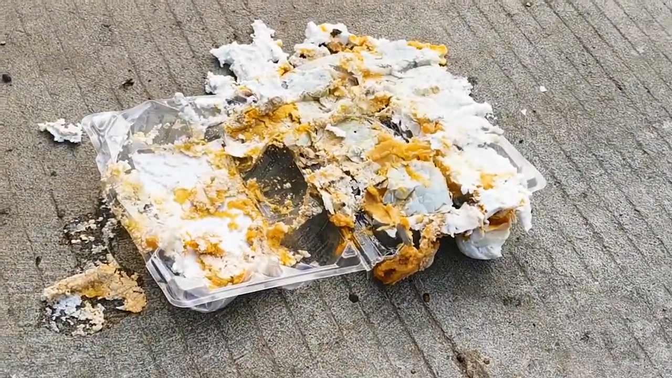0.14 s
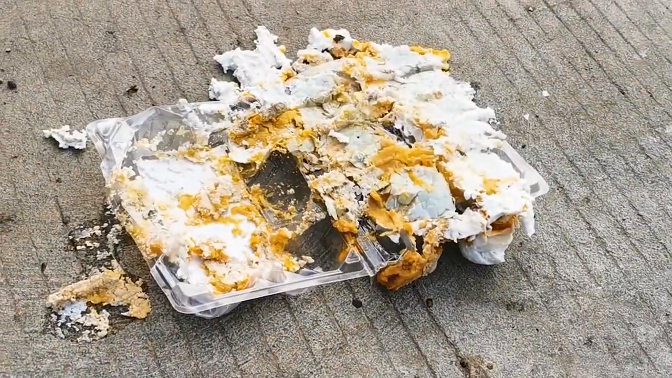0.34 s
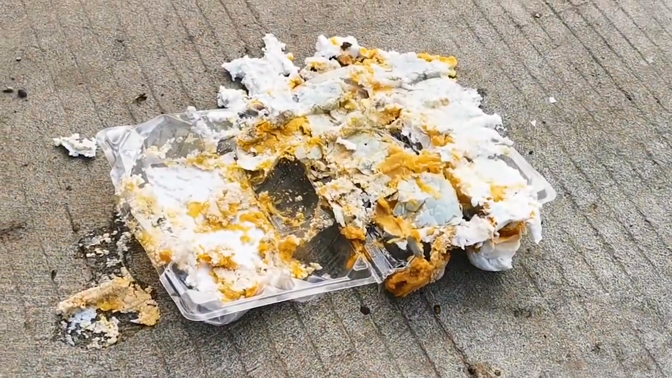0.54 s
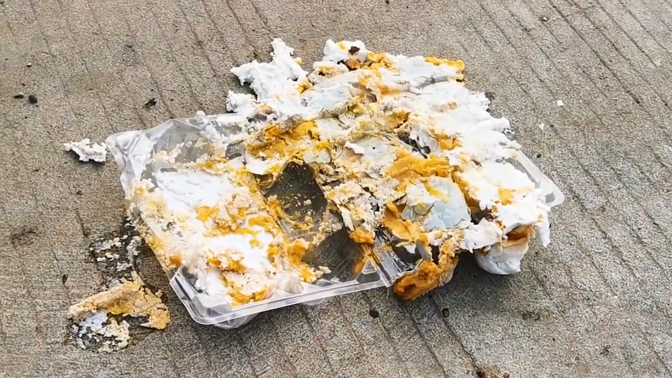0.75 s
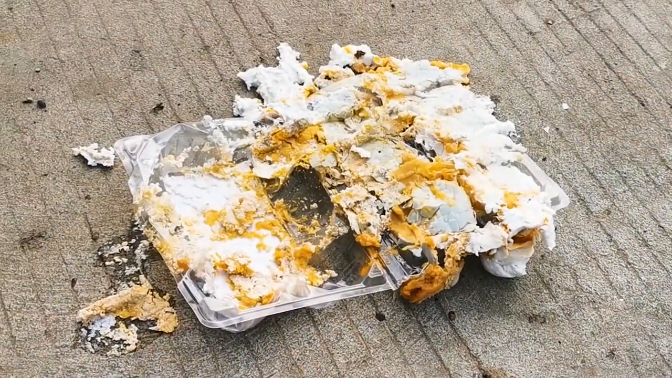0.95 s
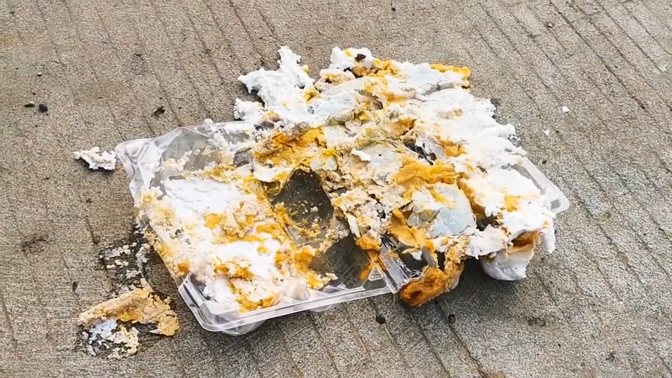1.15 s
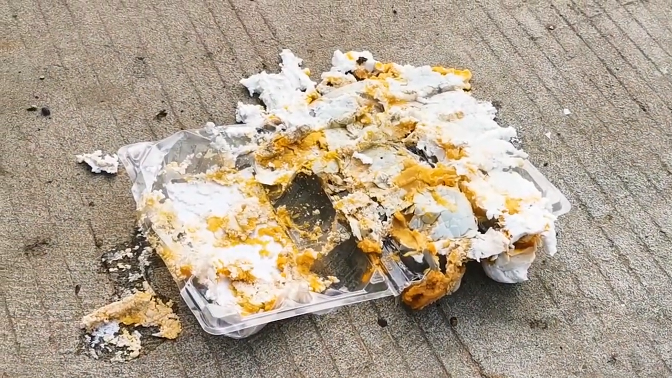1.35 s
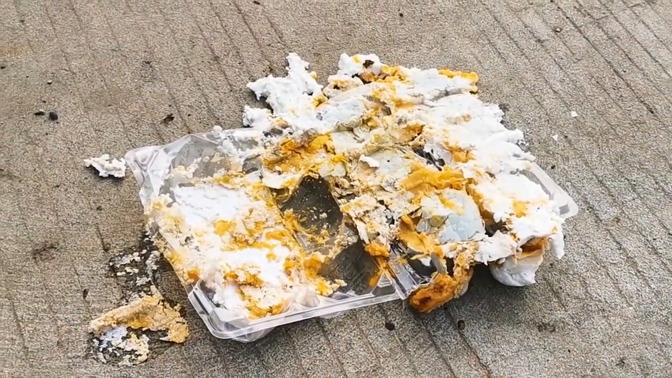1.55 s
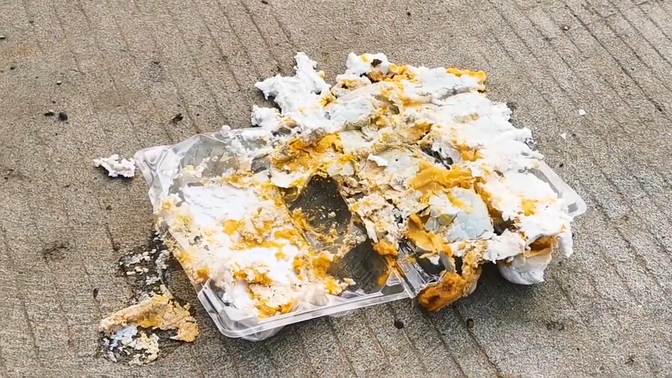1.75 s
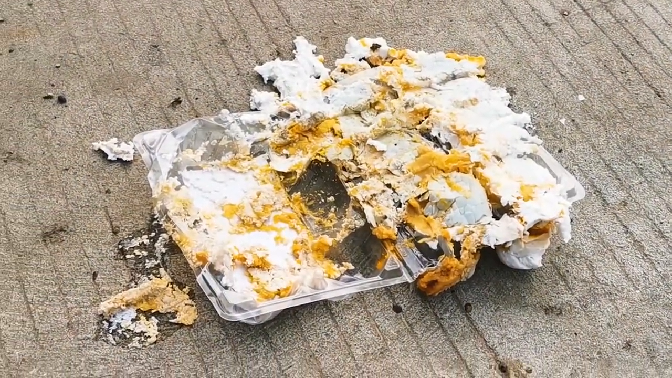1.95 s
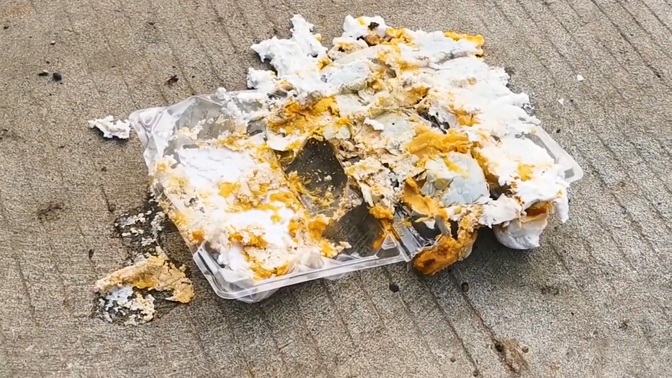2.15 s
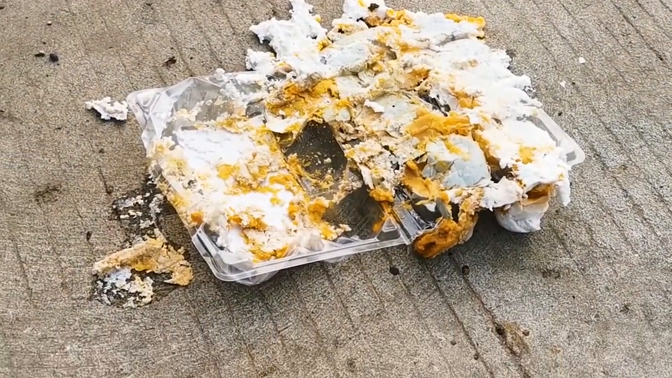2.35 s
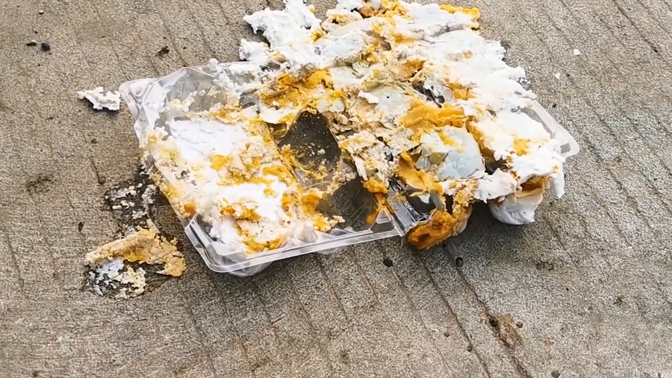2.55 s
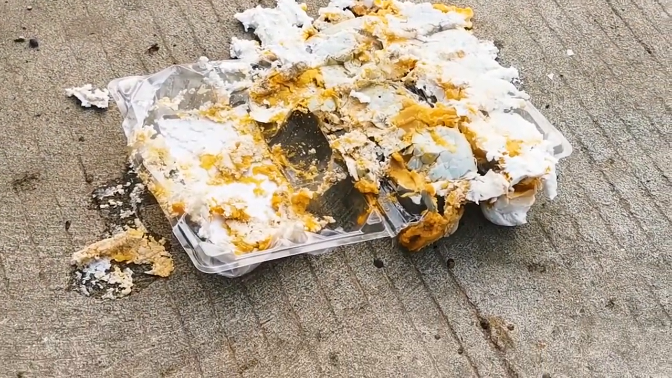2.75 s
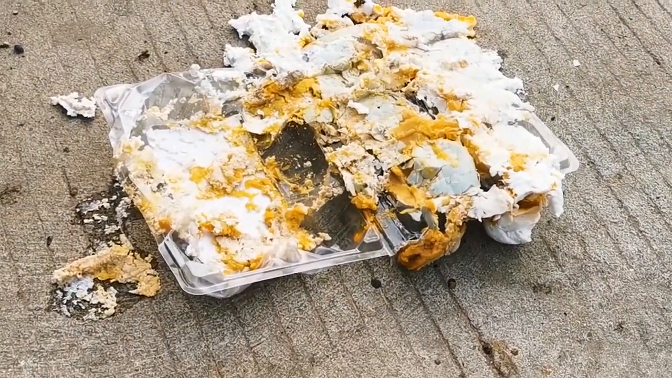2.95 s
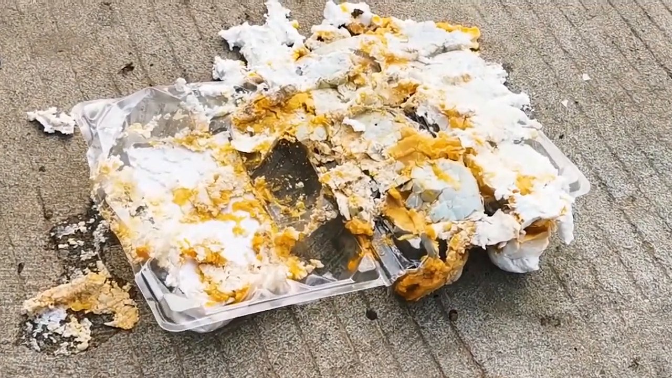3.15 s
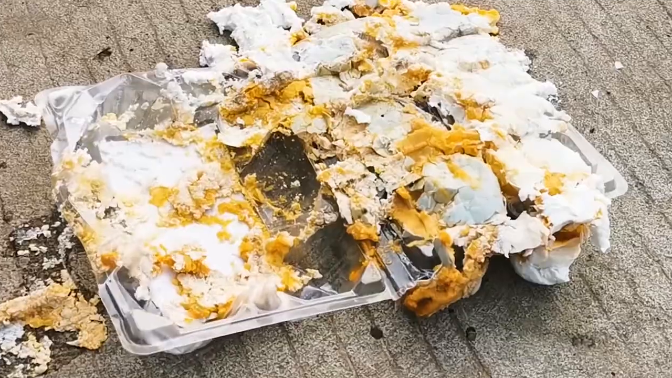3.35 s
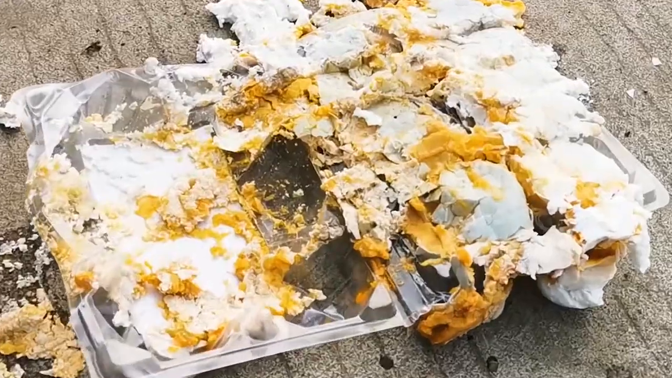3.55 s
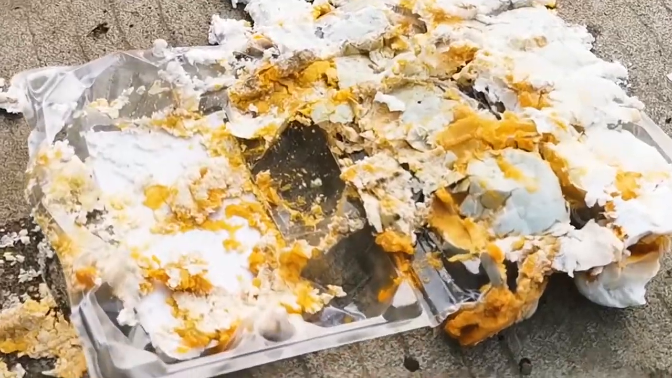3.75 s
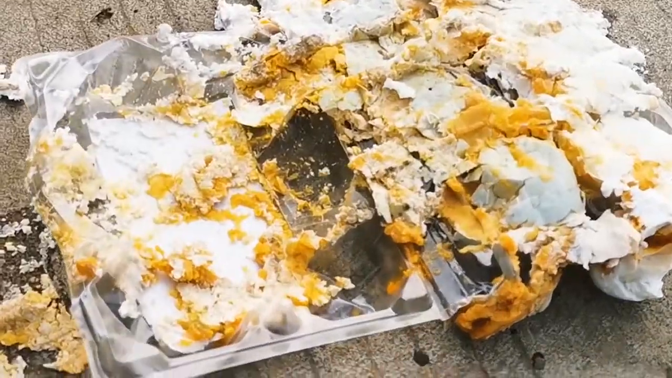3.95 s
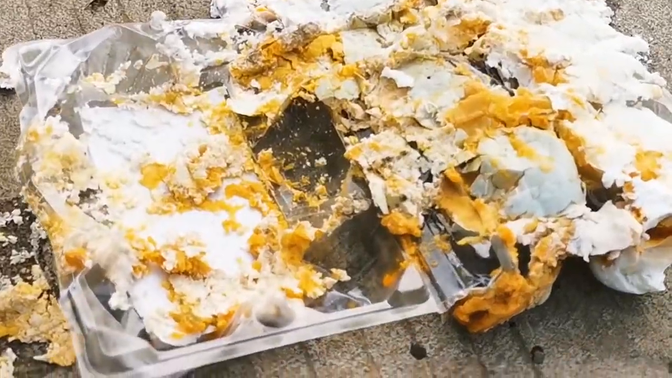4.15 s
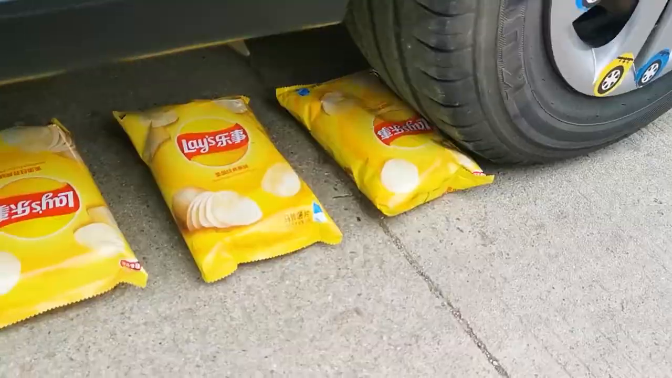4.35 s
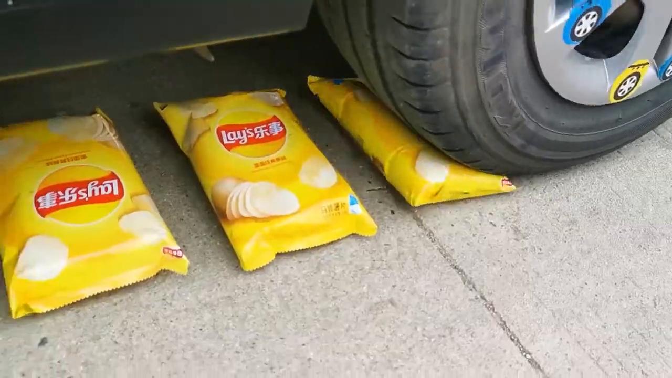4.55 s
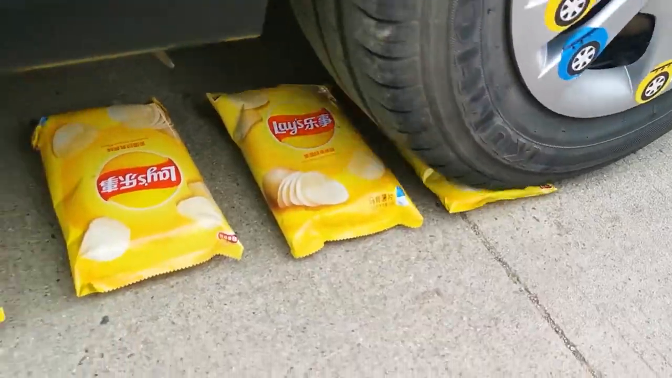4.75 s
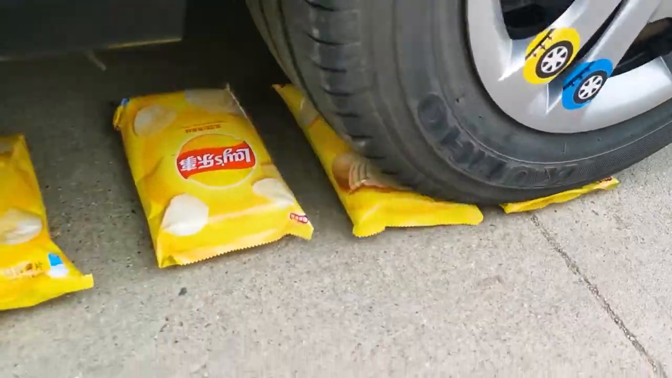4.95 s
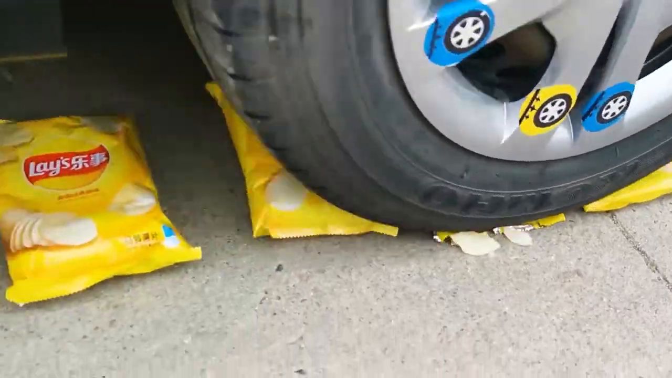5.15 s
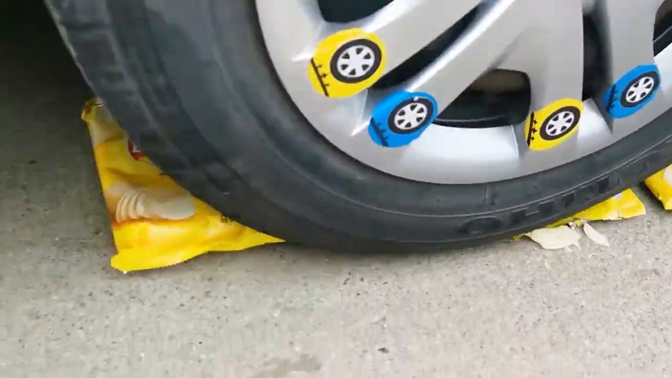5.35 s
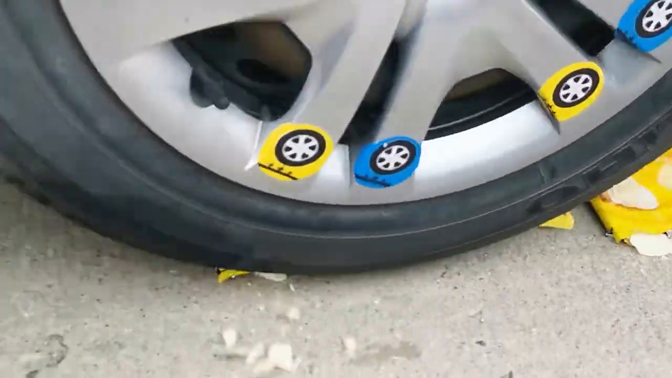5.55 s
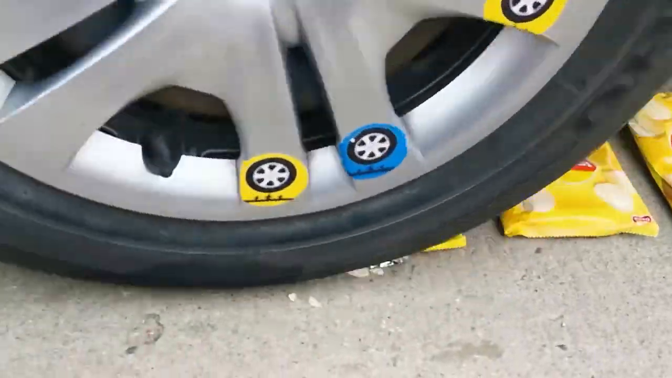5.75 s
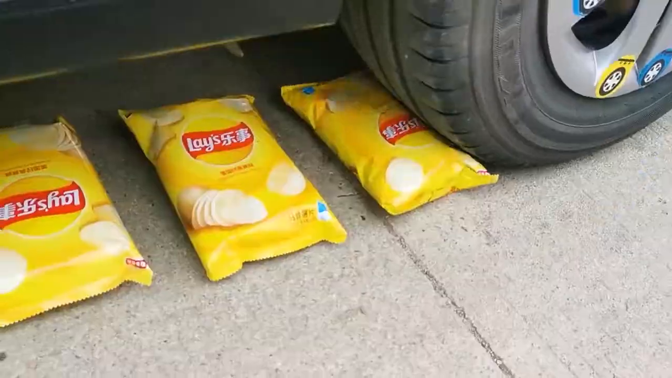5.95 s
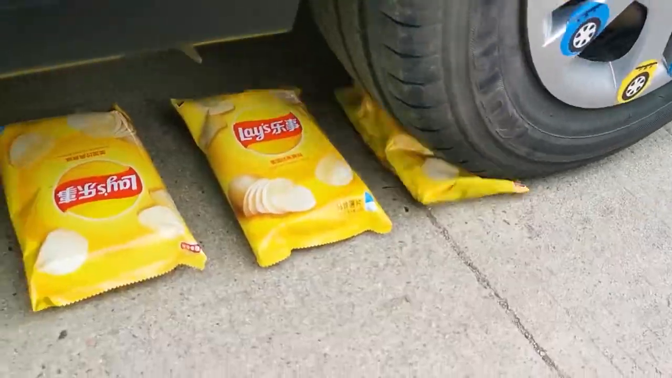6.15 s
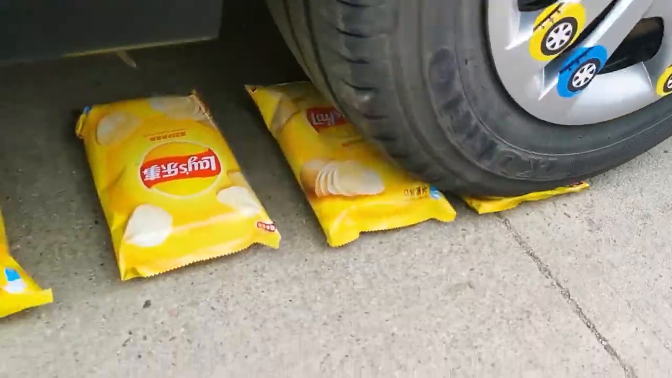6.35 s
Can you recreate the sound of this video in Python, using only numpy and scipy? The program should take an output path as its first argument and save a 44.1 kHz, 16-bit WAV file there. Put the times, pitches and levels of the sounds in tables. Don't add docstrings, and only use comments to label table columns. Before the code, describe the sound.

An engine idles over a concrete yard with tray knocks and gritty scuffs, then a creeping tyre crunches chip bags that burst with loud pops.

```python
import sys
import numpy as np
from scipy import signal
from scipy.fft import rfft, irfft
from scipy.io import wavfile
from scipy.ndimage import uniform_filter1d, map_coordinates

SR = 44100
rng = np.random.default_rng(int(sys.argv[2]) if len(sys.argv) > 2 else 0)


def output_pcm(signal):
    pcm = np.clip(np.atleast_2d(signal).T, -1, 1) * 32767
    wavfile.write(sys.argv[1], SR, np.round(pcm).astype(np.int16))


def convert_level_to_amplitude(level_db):
    exponent = np.asarray(level_db, float) / 20
    return 10 ** exponent


N = 281799
CLOCK = np.arange(N) / SR
LEFT_RIGHT = np.array([[1], [-1]])
CUT_S, BACK_S, CREEP_S = 4.232, 4.3205, 1.6
CREEP_SIZE = round(CREEP_S * SR)
CREEP = slice(round(BACK_S * SR), round(BACK_S * SR) + CREEP_SIZE)


def in_time(rows):
    s, *columns = np.transpose(rows)
    return [np.interp(CLOCK, s, column) for column in columns]


def at_hz(points, hz):
    table_hz, values = np.transpose(points)
    return np.interp(np.log(hz), np.log(table_hz), values)


def rms_one(x):
    return x / np.sqrt(np.mean(x ** 2) + 1e-20)


def drift(rate_hz, size):
    step = 16
    r = np.exp(-2 * np.pi * rate_hz * step / SR)
    white = rng.standard_normal(size // step + 3002)
    slow = signal.lfilter([1], [1, -2 * r, r * r], white)[3000:]
    return np.interp(np.arange(size) / step, np.arange(len(slow)), rms_one(slow))


def band(x, low_hz, high_hz):
    edges = [low_hz, min(high_hz, .45 * SR)]
    return signal.sosfilt(signal.butter(2, edges, "band", fs=SR, output="sos"), x)


def widen(mid, side, alike):
    alike = np.clip(alike, -1, 1)
    return np.sqrt(1 + alike) * mid + np.sqrt(1 - alike) * side * LEFT_RIGHT


def noise(size=N):
    return rng.standard_normal((2, 2, size))


EDGES = np.append(22 * 2 ** np.arange(0, 6, 1 / 3), 1408 * 2 ** np.arange(0, 3.7, 1 / 5))


def coloured(source, spectrum, likeness, patchy_db, rate_hz):
    out, size = 0, source.shape[-1]
    together = drift(rate_hz / 3, size)
    for k, (low, high) in enumerate(zip(EDGES, EDGES[1:])):
        hz = np.sqrt(low * high)
        if spectrum[0][0] < hz < spectrum[-1][0]:
            mid, side = band(source[k % len(source)], low, high)
            flicker_db = patchy_db * (together + drift(rate_hz, size))
            out = out + convert_level_to_amplitude(at_hz(spectrum, hz) + flicker_db) * widen(mid, side, at_hz(likeness, hz))
    return rms_one(out)


def ring(t, hz, t60):
    return np.sin(2 * np.pi * hz * t) * convert_level_to_amplitude(-60 * t / t60)


def add(out, s, sound):
    i = round(s * SR)
    out[..., i:i + sound.shape[-1]] += sound[..., :N - i]


def swell(t, s, hold_s, rise_db_per_s, fall_db_per_s):
    return -rise_db_per_s * np.maximum(s - t, 0) - fall_db_per_s * np.maximum(t - s - hold_s, 0)


# t/s, firing rate f/Hz, body drone level/dB re its mean, nearness level/dB
IDLE = [(0.0, 31.63, -4, -0.5), (0.56, 31.82, 4.5, 2.5), (0.7, 32.09, -8.5, 2), (1.1, 32.53, -8.5, 1.5),
        (1.43, 31.8, -9, -1), (1.8, 31.05, -3.5, 1), (1.95, 30.27, -10, -1), (2.34, 30.55, -8.5, 0),
        (2.6, 30.31, -3, 0.5), (3.1, 31.15, -2.5, 2), (3.75, 31.19, 4, 3.5), (4.22, 31.4, 3, 1.5)]
# multiple of the firing rate, level/dB, share of the drone swing,
# share of the nearness swing
SWAYING_ORDERS = [(1, -42.5, 0.05, 0.1), (6, -44.5, 0.38, 0.091), (15, -56, 1.29, 0.12), (9.5, -64, .2, 1.5),
                  (8.7, -68, .2, 1.5)]
# multiple of the firing rate, level/dB
FLICKERING_ORDERS = [(2, -56.5), (3, -74), (4, -65), (5, -57.5), (7, -64), (43, -60)]


def engine():
    hz, drone_db, near_db = in_time(IDLE)
    turn = 2 * np.pi * np.cumsum(hz) / SR
    out = np.zeros(N)
    for k, db, drone_share, near_share in SWAYING_ORDERS:
        level_db = db + drone_share * drone_db + near_share * near_db + 0.81 * drift(1.3, N)
        out += convert_level_to_amplitude(level_db) * np.sin(k * turn + k)
    for k, db in FLICKERING_ORDERS:
        out += convert_level_to_amplitude(db + 3.9 * drift(29.0, N)) * np.sin(k * turn + 3 * k)
    return out


# f/Hz, level/dB per Hz
YARD_LOW = [(18, -41), (30, 1), (53, -8.5), (108, -15), (139, -16), (187, -14), (252, -25), (483, -22.5),
            (630, -25.5), (924, -22), (1600, -36), (2080, -77), (3520, -120)]
# f/Hz, level/dB per Hz
YARD_HIGH = [(760, -36), (1300, -14), (1470, -12.5), (1860, 2), (2370, -0.5), (3450, -6), (3880, 6.5),
             (4440, -49), (5260, -8.5), (6150, -11), (8790, -15), (9460, -8), (11200, -18.5),
             (12300, -22.5), (16000, -39)]
# f/Hz, likeness
YARD_LIKENESS = [(60, .99), (300, .96), (700, .85), (1100, .55), (2200, .7), (5000, .45), (15000, .3)]
# f/Hz, width f/Hz, level/dB
WHIRRS = [(5150, 890, -65.5), (7990, 500, -69), (9300, 50, -87), (9300, 39, -83), (11100, 50, -76)]


def yard_air():
    near_db = in_time(IDLE)[2]
    out = convert_level_to_amplitude(-50 + near_db) * coloured(noise(), YARD_LOW, YARD_LIKENESS, 0.98, 50.0)
    rustle_db = -57 + 0.48 * near_db
    out += convert_level_to_amplitude(rustle_db) * coloured(noise(), YARD_HIGH, YARD_LIKENESS, 0.87, 45.0)
    mid, side = rng.standard_normal((2, N))
    for hz, width_hz, db in WHIRRS:
        out += convert_level_to_amplitude(db) * rms_one(band(mid + .5 * side * LEFT_RIGHT, hz - width_hz / 2, hz + width_hz / 2))
    return out


TRAY_HZ = [423, 520, 610, 800, 890, 1063, 1200, 1274, 1335, 1400, 1500, 1754, 1950, 2180, 2300, 2506, 3150,
           3700, 4400, 5150, 7800, 8200]
# t/s, peak level/dB, centre f/Hz, spread/octaves
KNOCKS = [(.326, -28, 1200, .3), (.327, -39, 1760, .05), (.343, -27, 1230, .3), (.356, -23.5, 1210, 0.14),
          (.36, -47, 423, .08), (.368, -26, 1400, 0.18), (.368, -38, 1760, .05), (.385, -30, 1200, .1),
          (.556, -42, 900, 0.14), (0.76, -39.5, 900, .2), (.608, -33.5, 1400, 0.09), (.625, -43, 890, .1),
          (.708, -32, 1000, .19), (.708, -48, 2180, .08), (.738, -34.5, 1760, 0.19),
          (.739, -40.5, 2180, 0.13), (.74, -37, 1000, .25), (.745, -42, 520, .1), (.752, -32, 1063, .24),
          (.805, -25.5, 1400, 0.045), (.827, -38.5, 890, .12), (.929, -45, 885, .09), (1.6, -53, 800, .08),
          (2.455, -48.5, 3150, .1), (3.461, -30, 2230, .3), (3.461, -41.5, 5150, .17),
          (3.497, -38, 900, .3), (3.506, -33.5, 2180, 0.61), (3.51, -41.5, 3150, .05),
          (3.513, -47, 5150, .15), (4.6, -39, 500, .2), (3.557, -37, 610, 0.11), (3.648, -44.5, 620, 0.12),
          (3.650, -28.5, 2158, 0.43), (3.651, -30, 8000, .1), (3.759, -41.5, 2100, .25),
          (3.762, -43, 800, 0.052), (3.782, -42.5, 2030, 0.22)]
# t/s, peak level/dB, f/Hz, ring t60/s
THUDS = [
    (0.369, -61, 180, 0.15),
    (0.749, -34, 134.6, 0.12),
    (2.462, -33.5, 128, 0.15),
]


def tray():
    out, t, modes = np.zeros(N), np.arange(SR // 3) / SR, np.array(TRAY_HZ)[:, None]
    rub_s, lean_db = 0.014, 5
    rub_size = SR // 20
    for s, db, hz, spread in KNOCKS:
        luck = rng.standard_normal((len(modes), 1))
        t60 = 0.044 + 0.17 * spread
        near = np.exp(-(np.log2(modes / hz) / spread) ** 2) + 0.011
        strength = near * convert_level_to_amplitude(1.5 * luck) * np.sign(luck)
        body = np.sum(strength * ring(t, modes, t60), axis=0)
        body *= 1 - np.exp(-t / .0015)
        rub = 0.04 * rng.standard_normal(rub_size) * np.exp(-t[:rub_size] / rub_s)
        rub[0] = 1
        body = signal.fftconvolve(body, rub)[:len(t)]
        add(out, s, convert_level_to_amplitude(db) * body / np.abs(body).max())
    for s, db, hz, t60 in THUDS:
        thud = ring(t, hz, t60) + .5 * ring(t, 2.0 * hz, t60 / 2)
        add(out, s, convert_level_to_amplitude(db) * thud * (1 - np.exp(-t / 0.0023)))
    return out * convert_level_to_amplitude(LEFT_RIGHT * lean_db / 2)


# t/s, peak level/dB, t60/s
SCUFFS = [(0.327, -40.5, 0.24), (0.3594, -51, 0.17), (0.6094, -58, 0.1), (0.739, -35, 0.068),
          (2.4473, -47, 0.14), (2.461, -52, 0.05), (3.454, -23.5, 0.16), (3.505, -20.5, 0.088),
          (3.5294, -40, 0.29), (3.647, -23, 0.11), (3.6744, -45, 0.069), (3.7609, -48, 0.11)]
# f/Hz, level/dB per Hz
SCUFF_COLOUR = [(290, -95), (500, 3), (922, 1.5), (1280, -2), (1680, 1), (2430, 2.5), (3100, -1),
                (4110, -1.5), (5160, -1), (6120, -6.5), (8250, 0.5), (10800, -7.5), (15000, -40)]


def scuffs():
    t, grit = np.arange(SR // 3) / SR, np.zeros(N)
    for s, db, t60 in SCUFFS:
        add(grit, s, convert_level_to_amplitude(db - 6.0 - 60 * t / t60) * (1 - np.exp(-t / 0.0053)))
    return grit * coloured(noise(), SCUFF_COLOUR, YARD_LIKENESS, 0.32, 84.0)


# f/Hz, level/dB per Hz
BRUSH_COLOUR = [(2000, -16), (2900, -6), (4000, -2.5), (5000, -9), (6200, -14), (8500, -10.5), (12000, -16),
                (15500, -36)]


def cloth_brush():
    level_db = -54 + swell(CLOCK, s=3.05, hold_s=0.15, rise_db_per_s=94, fall_db_per_s=17)
    return convert_level_to_amplitude(level_db) * coloured(noise(), BRUSH_COLOUR, YARD_LIKENESS, .7, 20.7)


# f/Hz, level/dB
YARD_BALANCE = [(60, 2), (200, 1), (500, 1.8), (800, 1.5), (1300, -2.5), (2400, -4.5), (8000, -3),
                (15000, 4)]


def yard():
    left, right = rfft(yard_air() + scuffs() + cloth_brush() + engine() + tray())
    hz = np.arange(len(left)) * SR / N + 1
    lean = convert_level_to_amplitude(at_hz(YARD_BALANCE, hz) / 2)
    late = np.exp(-2j * np.pi * hz * 18 / SR)
    housing_dip = convert_level_to_amplitude(-9 * np.exp(-((hz - 5740) / 320) ** 2))
    ports = irfft([left * housing_dip * lean, right * housing_dip * late / lean], N)
    return ports * (CLOCK < CUT_S)


# t/s, f/Hz, level/dB
WHINE = [(4.32, 200, -39), (4.5, 225, -52), (4.7, 265, -51), (5.2, 265, -49), (5.6, 255, -63),
         (5.8, 225, -45), (5.95, 253, -41.5)]
# f/Hz, level/dB per Hz
RUMBLE = [(12, -27), (20, 0.5), (59, -1.5), (97, -10), (157, -9.5), (230, -18.5), (350, -11.5), (460, -69),
          (770, -120)]
# t/s, level/dB
BED = [(4.32, -60), (4.5, -61), (4.6, -43.5), (4.8, -43.5), (5.1, -47.5), (5.4, -45.5), (5.6, -41.5),
       (5.75, -47.5), (5.83, -50.5), (5.87, -53.5)]
# f/Hz, level/dB per Hz
BED_COLOUR = [(13, -44), (22, -28), (85, -38), (165, -25), (200, 2.5), (263, 8), (337, -7), (672, 2),
              (1670, -5.5), (1860, -1), (2080, -10), (5200, -7.5), (6300, -18), (8000, -11), (9200, -17),
              (10900, -12.5), (16000, -38)]
# f/Hz, likeness
ROLL_LIKENESS = [(28, 0.84), (60, 0.93), (110, 0.98), (180, 0.91), (550, 0.5), (1650, 0.28), (4970, -0.28),
                 (15000, -0.21)]


def creeping_car():
    size = CREEP_SIZE
    whine_hz, whine_db = (c[CREEP] for c in in_time(WHINE))
    bed = convert_level_to_amplitude(in_time(BED)[0][CREEP])
    out = convert_level_to_amplitude(whine_db + 1) * coloured(noise(size), RUMBLE, ROLL_LIKENESS, 4.0, 61.0)
    out += bed * coloured(noise(size), BED_COLOUR, ROLL_LIKENESS, 1.0, 3.3)
    idle_hz = 67 + 2.5 * drift(1.65, size)
    idle = convert_level_to_amplitude(-11.5 + 1.3 * drift(24.0, size)) * np.sin(2 * np.pi * np.cumsum(idle_hz) / SR)
    whine_hz = whine_hz + 9 * drift(30, size)
    whine = convert_level_to_amplitude(whine_db + 3 * drift(25, size)) * np.sin(2 * np.pi * np.cumsum(whine_hz) / SR)
    return out + bed * idle + whine


# t/s, dull crush level/dB, bright crunch level/dB, build-up dB/s, hold/s,
# crunch lost by the burst level/dB
CRUSHES = [
    (4.323, -42.5, -56.5, 902, .03, 8.5),
    (4.401, -37.5, -35.5, 332, 0.085, 16),
    (4.881, -40.5, -37, 202.5, .05, 6),
    (5.174, -36, -34, 198, .012, 15),
    (5.679, -66, -65, 213, 0.016, 8.5),
    (5.44, -37, -38.5, 255.5, 0.01, 6.5),
]


def loads():
    hush, bursts = np.ones(N), [pop[0] for pop in POPS]
    dull, bright = np.zeros((2, N))
    for s, dull_db, bright_db, rise, hold_s, loss_db in CRUSHES:
        end = min(b for b in bursts + [s + 0.15] if b > s)
        until = CLOCK < end
        dull += convert_level_to_amplitude(dull_db + swell(CLOCK, s, hold_s, rise, 460)) * until
        bright += convert_level_to_amplitude(bright_db + swell(CLOCK, s, hold_s, rise, loss_db / (end - s - hold_s))) * until
    for s in bursts:
        dull += convert_level_to_amplitude(-35.5 - 99 * (CLOCK - s).clip(0)) * (CLOCK > s)
        hush[(CLOCK > s - .008) & (CLOCK < s)] = convert_level_to_amplitude(-5)
    return dull, bright, uniform_filter1d(hush, size=200)


def grains(per_s, spread_db, hiss):
    rate = per_s * convert_level_to_amplitude(3 * drift(60., CREEP_SIZE))
    born = rng.random((5, 1, CREEP_SIZE)) < rate / SR
    sizes = convert_level_to_amplitude(spread_db * np.minimum(rng.exponential(1, born.shape), 4)) * born
    spits = signal.lfilter([1], [1, -.965], sizes)
    return (rms_one(spits[0] + spits[1:]) + hiss) * rng.standard_normal((4, 2, CREEP_SIZE))


CRUMB_DB = -5.5
# f/Hz, level/dB per Hz
CRUSH = [(150, -6), (250, -2), (441, -7.5), (632, -2), (1140, -6.5), (1500, -4), (2040, -42), (2400, 1.5),
         (3120, -40), (5280, -120)]
# f/Hz, level/dB per Hz
CRUNCH = [(1000, -47), (1700, -6), (2090, 10), (2500, -2), (2790, 7), (3130, 1), (3400, 0), (3770, 6),
          (5760, -1), (7920, -1), (11200, -2.5), (14300, -19), (16000, -14)]


def rolling():
    dull, bright, hush = (c[CREEP] for c in loads())
    crumbs = convert_level_to_amplitude(in_time(BED)[0][CREEP] + CRUMB_DB)
    now = creeping_car()
    now += dull * coloured(grains(700, 4, .3), CRUSH, ROLL_LIKENESS, 1.3, 39.7)
    now += (bright + crumbs) * coloured(grains(600, 4.2, .35), CRUNCH, ROLL_LIKENESS, 0.6, 14.0)
    out = np.zeros((2, N))
    out[:, CREEP] = now * hush
    return out


# t/s, peak level/dB, centre f/Hz
SNAPS = [(4.3369, -40, 1710.0), (4.3411, -35, 4190.0), (4.3417, -37, 1270.0), (4.3512, -38.0, 1710.0),
         (4.3524, -54, 4190.0), (4.3639, -55, 5640.0), (4.3711, -21.5, 4140), (4.372, -21.5, 1270.0),
         (4.3884, -17, 5610), (4.3925, -12, 10170), (4.3932, -48, 4190.0), (4.4047, -19, 700.0),
         (4.4057, -17, 4130), (4.4142, -14, 1690), (4.4184, -15.5, 4170), (4.4248, -42, 4190.0),
         (4.4299, -23, 700.0), (4.4307, -12, 7640), (4.4339, -23, 5640.0), (4.4383, -18.5, 7700),
         (4.4467, -44, 7600.0), (4.4471, -15.5, 1280), (4.456, -24, 4190.0), (4.4657, -24, 3110.0),
         (4.4748, -22, 7600.0), (4.4771, -26.5, 3110.0), (4.4824, -12, 3110.0), (4.494, -24, 3110.0),
         (4.4946, -26, 10230.0), (4.4975, -27, 4190.0), (4.5068, -24, 4190.0), (4.514, -27, 4190.0),
         (4.5144, -35.0, 10230.0), (4.5221, -14.5, 7700), (4.5337, -13, 5300), (4.5443, -23.0, 4130),
         (4.5481, -26, 10230.0), (4.5617, -12.5, 7600.0)]
# t/s, peak level/dB, centre f/Hz
LATER_SNAPS = [(4.6256, -42, 4190.0), (4.6758, -35, 4190.0), (4.6882, -43, 4190.0), (4.706, -29, 3110.0),
               (4.7194, -27, 7700), (4.738, -32, 4190.0), (4.767, -34.0, 2310.0), (4.7664, -28, 7600.0),
               (4.7925, -33.0, 10300), (4.8106, -39, 10230.0), (4.844, -30, 10240), (4.8535, -40, 4190.0),
               (4.8704, -34, 3110.0), (4.8738, -30, 5640.0), (4.8775, -26, 10230.0), (4.879, -31, 2310.0),
               (4.8868, -23, 7600.0), (4.8896, -20, 1260), (4.8983, -28, 3110.0), (4.903, -35, 1270.0),
               (4.9158, -34, 7600.0), (4.917, -27.0, 3110.0), (4.921, -29, 5640.0), (4.926, -29, 4190.0),
               (4.9299, -23, 3110.0), (4.9303, -34, 7600.0), (4.936, -27.0, 4190.0), (4.943, -23, 1710.0),
               (4.9557, -36, 4190.0), (5.0784, -29.5, 940.0), (5.1168, -31, 2310.0), (5.1174, -23, 13790.0),
               (5.1259, -31.0, 10230.0), (5.1364, -36, 10230.0), (5.1419, -35, 1710.0),
               (5.1589, -35, 10230.0), (5.1592, -27, 1270.0), (5.1632, -42, 7600.0), (5.175, -20.5, 940.0),
               (5.1768, -31, 5600), (5.1806, -20, 3110.0), (5.1835, -23, 3110.0)]
# t/s, peak level/dB, centre f/Hz
LAST_SNAPS = [(5.2741, -38, 7600.0), (5.2742, -29, 3110.0), (5.2882, -26, 7600.0), (5.293, -28.0, 7700),
              (5.301, -29, 7600.0), (5.3317, -33, 5664), (5.339, -23, 2310.0), (5.347, -33.0, 7600.0),
              (5.3617, -27, 10300), (5.3617, -20, 2170), (5.3869, -39, 4190.0), (5.3956, -36.0, 7600.0),
              (5.4124, -32, 7500), (5.43, -31.0, 5640.0), (5.4369, -25, 700.0), (5.4446, -19.5, 3110.0),
              (5.4445, -25.0, 7600.0), (5.451, -28.0, 3110.0), (5.4525, -26, 940.0),
              (5.4546, -25.0, 4190.0), (5.4792, -25, 3110.0), (5.4826, -33, 5630), (5.4999, -32.0, 10230.0),
              (5.5061, -30.0, 10230.0), (5.5121, -31, 7600.0), (5.5893, -28, 940.0),
              (5.5994, -36.0, 10230.0), (5.6139, -32, 10230.0), (5.6913, -36.0, 10230.0),
              (5.7474, -27, 10400), (5.7623, -47, 13790.0), (5.7653, -41.0, 10230.0),
              (5.7711, -44, 10230.0), (5.8276, -39, 10230.0), (5.835, -38, 10230.0), (5.8717, -29, 4190.0)]
# t/s, peak level/dB, centre f/Hz
DULL_SNAPS = [
    (4.3692, -17.5, 2100),
    (4.4, -23.5, 550),
    (4.8, -23.5, 280),
    (5.675, -27.5, 880),
    (4.498, -27, 3400),
    (4.4195, -21, 11000),
    (5.8718, -41, 13000),
]


def small_snaps():
    crunch = loads()[1] + convert_level_to_amplitude(in_time(BED)[0] + CRUMB_DB + 3.5) * (CLOCK > 4.36)
    when, pitch, size = rng.random((220, 3)).T
    at = np.searchsorted(np.cumsum(crunch) / crunch.sum(), when)
    level_db = 20 * np.log10(crunch[at]) - 0.5 + 11.8 * size
    return list(zip(at / SR, level_db, 900 * 2 ** (3.61 * pitch)))


def snaps():
    out, t = np.zeros((2, N)), np.arange(SR // 40) / SR
    for s, db, hz in SNAPS + LATER_SNAPS + LAST_SNAPS + DULL_SNAPS + small_snaps():
        both, *own = rng.standard_normal((3, len(t)))
        pan_db = 2.5 * rng.standard_normal()
        fade = convert_level_to_amplitude(-60 * t / (.003 + 9 / hz)) + .15 * convert_level_to_amplitude(-60 * t / .025)
        spit = (both + np.array(own)) * fade
        spit = band(spit, hz / 1.6, hz * 1.445) + .22 * band(spit, hz / 2.8, hz * 3.3)
        spit /= np.abs(spit).max(axis=1, keepdims=True)
        add(out, s, spit * convert_level_to_amplitude(db - 1.0 + LEFT_RIGHT * pan_db / 2))
    return signal.sosfilt(signal.butter(1, 11000., fs=SR, output="sos"), out)


# f/Hz, level/dB, t60/s
GAPS = [
    [(95, -24, 0.15), (264, 6.5, 0.037), (180, 12, 0.025), (325, 3, 0.056), (528, 7.5, 0.038),
     (696, 3, 0.044), (630, 3, 0.076), (1000, 11.5, 0.029), (1270, -19, 0.15), (1400, -25, 0.025)],
    [(180, -8.5, 0.096), (246, 10.5, 0.028), (325, 8.5, 0.052), (455, -44, 0.084), (531, 5.5, 0.082),
     (676, 15, 0.043), (746, -7, 0.052), (972, 7, 0.036), (1202, 13.5, 0.03)],
    [(76, -17, 0.087), (170, 8, 0.029), (355.5, -8, 0.13), (1070, 7, 0.019), (603, -11.5, 0.15),
     (710, 14.5, 0.02), (930, -17, 0.024), (1120, 22.5, 0.014), (1360, 8, 0.023)],
    [(189, -3.5, 0.087), (358, 6, 0.059), (507, 4, 0.044), (663, 4, 0.044), (778, 18.5, 0.022),
     (1000, -16, 0.041), (1170, 23.5, 0.016), (1400, -9, 0.029), (1760, 13, 0.019)],
]


def gap_ring(modes, t):
    out = 0
    for hz, level_db, t60 in modes:
        turn = rng.random() + hz / 9000 * rng.standard_normal((2, 1)) + .04 * LEFT_RIGHT
        out = out + convert_level_to_amplitude(level_db - 60 * t / t60) * np.sin(2 * np.pi * (hz * t + turn))
    return out * (1 - np.exp(-(t / 0.0045) ** 2))


# f/Hz, level/dB per Hz
TAIL = [(29, -63), (50, -9.5), (157, -13), (236, -12), (428, 1.5), (506, -4), (1110, -2.5), (1220, 10),
        (1350, 9), (1650, 2.5), (2200, -0.5), (9760, -26), (15000, -25)]
# f/Hz, t60/s
TAIL_T60 = [(60, 0.51), (300, 0.33), (800, 0.13), (2000, 0.034), (6000, 0.1), (15000, 0.054)]


def echo_tail(t):
    white, tail = noise(len(t)), 0
    for k, (low, high) in enumerate(zip(EDGES[2::2], EDGES[4::2])):
        hz = np.sqrt(low * high)
        mid, side = band(white[k % 2], low, high)
        fade = convert_level_to_amplitude(at_hz(TAIL, hz) - 60 * t / at_hz(TAIL_T60, hz))
        tail = tail + fade * widen(mid, side, at_hz(ROLL_LIKENESS, hz))
    return tail / tail[:, :SR // 50].std() * (1 - np.exp(-t / 0.00046))


# t/s, peak level/dB, first swing f/Hz, swing t60/s, crack level/dB, tail level/dB
POPS = [
    (4.5741, -1, 710, 0.011, -11, -15.5),
    (4.972, -6, 564, 0.01, -9.5, -17),
    (5.231, 0, 824, 0.0036, -14.5, -20.5),
    (5.5271, -5.5, 900, 0.0038, -5.5, -15),
]


def pops():
    out, t = np.zeros((2, N)), np.arange(SR // 3) / SR
    push_hz, pushes_db = 80, [-20, -26, -32, -28]
    for (s, db, swing_hz, swing_t60, crack_db, tail_db), modes, push_db in zip(POPS, GAPS, pushes_db):
        swing = np.sin(2 * np.pi * swing_hz * t) * convert_level_to_amplitude(-60 * (t / swing_t60) ** 2)
        body = swing + 0.4 * gap_ring(modes, t)
        crack_fade = convert_level_to_amplitude(-60 * t / 0.026) + 0.13 * convert_level_to_amplitude(-60 * t / 0.16)
        crack = band(rng.standard_normal((2, len(t))), 570, 9860) * crack_fade
        add(out, s, convert_level_to_amplitude(db) * (body + convert_level_to_amplitude(tail_db) * echo_tail(t) + convert_level_to_amplitude(crack_db) * crack))
        bulge = np.hanning(round(.006 * SR)) ** 2
        add(out, s - .003, convert_level_to_amplitude(db - 19) * bulge)
        push = np.sin(2 * np.pi * push_hz * t) * (t < 1 / push_hz)
        add(out, s - .003, convert_level_to_amplitude(push_db) * np.array([[1], [-.4]]) * push)
        puff = band(rng.standard_normal((2, len(t))), 27, 83) * convert_level_to_amplitude(-60 * t / 0.1)
        add(out, s, convert_level_to_amplitude(db - 1.0 + 4. * LEFT_RIGHT) * puff)
    return signal.sosfilt(signal.butter(2, 24, "high", fs=SR, output="sos"), out)


# f/Hz, level/dB
LEFT_PORT = [(1400, 0), (3800, 1.8), (5400, -1), (6700, 2.5), (7800, 11), (8400, 7), (9500, -11),
             (10400, -10), (12000, -4), (15200, 2)]


def scene():
    first = yard()
    second = rolling() + pops() + snaps()
    hz = np.arange(N // 2 + 1) * SR / N + 1
    port_db = at_hz(LEFT_PORT, hz) * np.array([[.6], [-.4]])
    second = irfft(rfft(second) * convert_level_to_amplitude(port_db), N)
    again, speed = round(5.9015 * SR), 1.2
    read = BACK_S * SR + speed * np.arange(N - again)
    second[:, again:] = [map_coordinates(c, [read], order=3) for c in second]
    return first + second


def roll_off(x):
    return signal.sosfilt(signal.butter(12, 16660, fs=SR, output="sos"), x)


def record(dry):
    rounded = 1.1 * np.tanh(dry / 1.1)
    mix = signal.sosfilt(signal.cheby2(10, 50, 16900, fs=SR, output="sos"), rounded)
    return roll_off(mix)


dry = scene()
out = record(dry)
output_pcm(out)
```